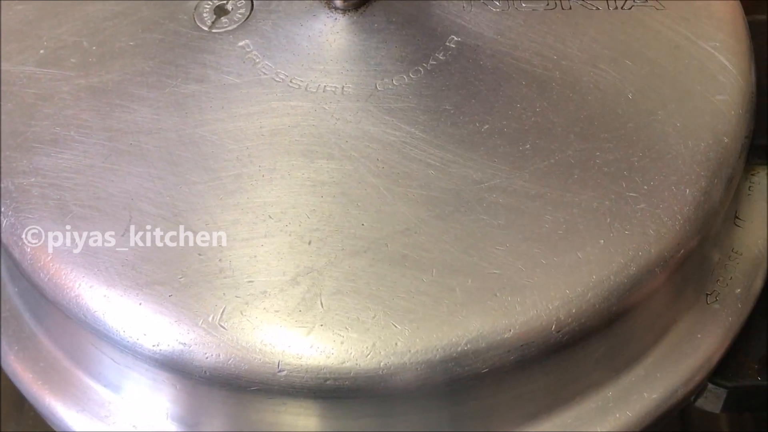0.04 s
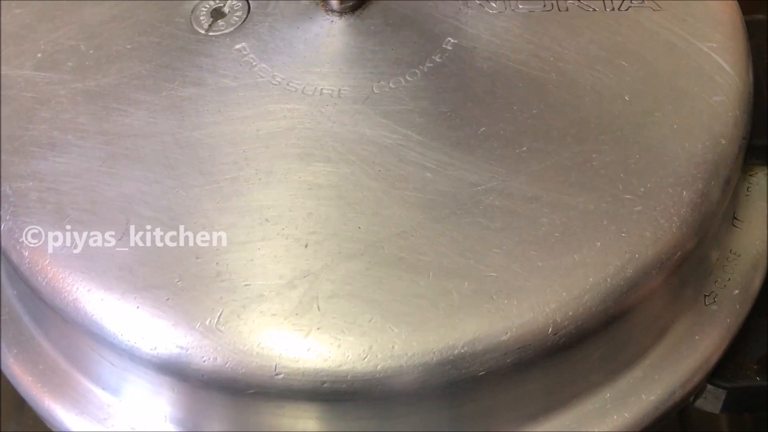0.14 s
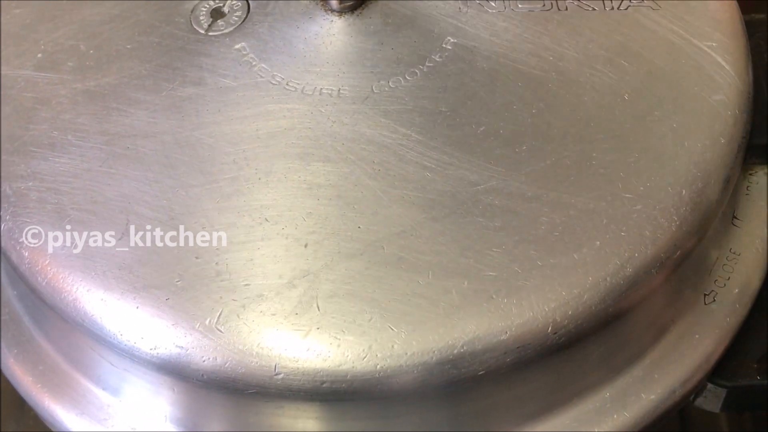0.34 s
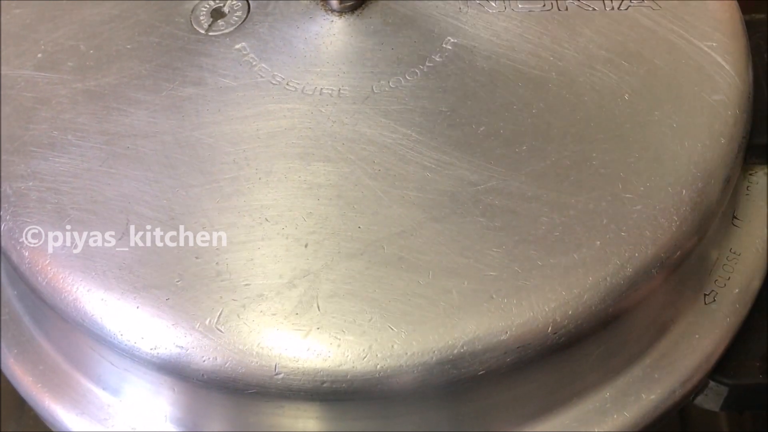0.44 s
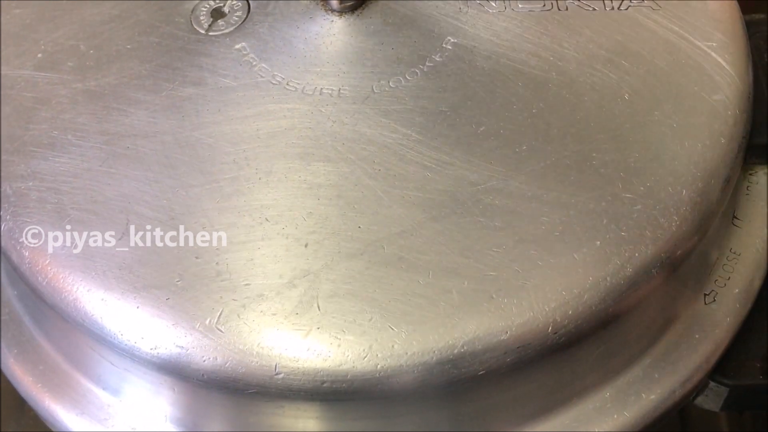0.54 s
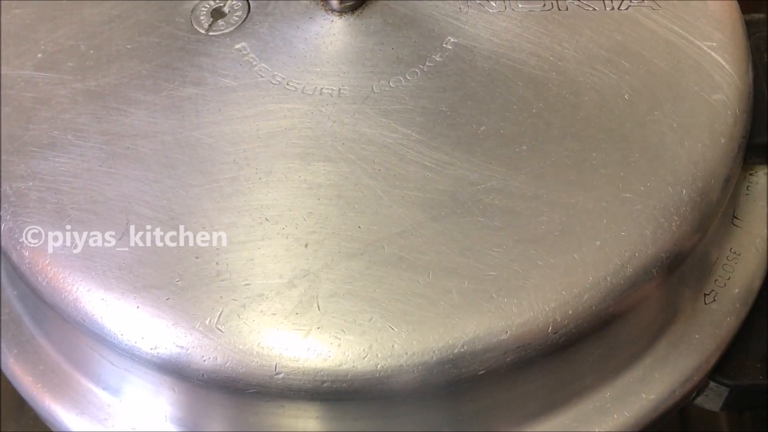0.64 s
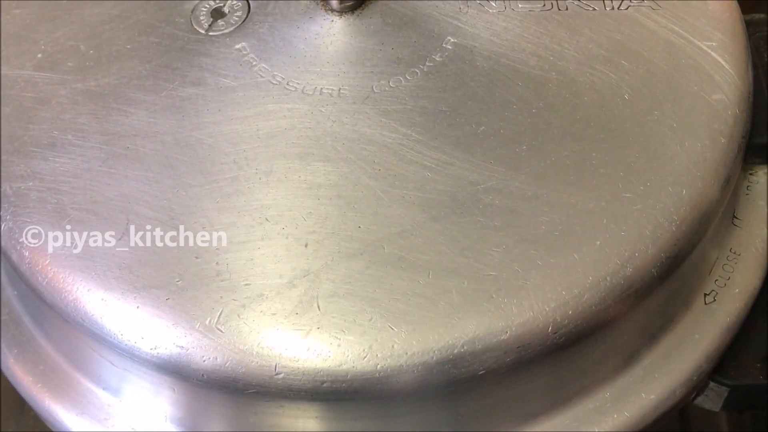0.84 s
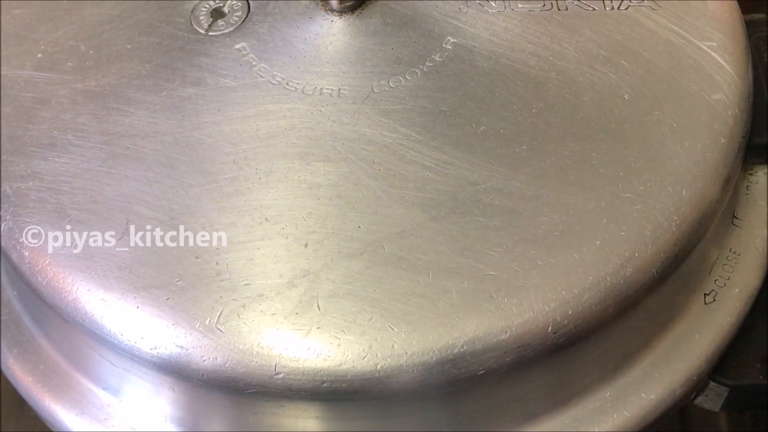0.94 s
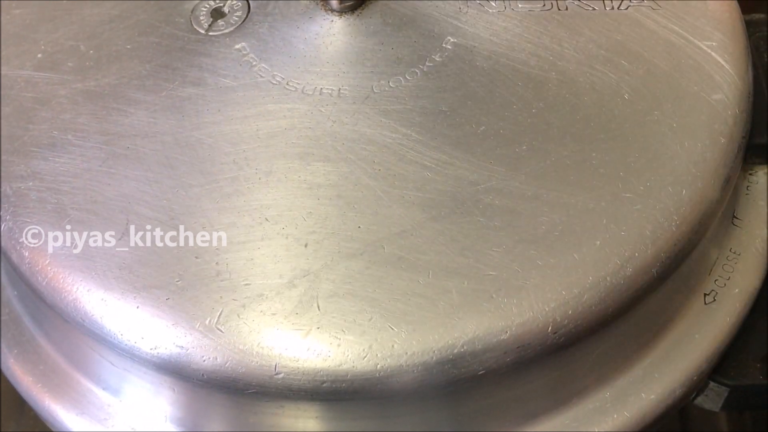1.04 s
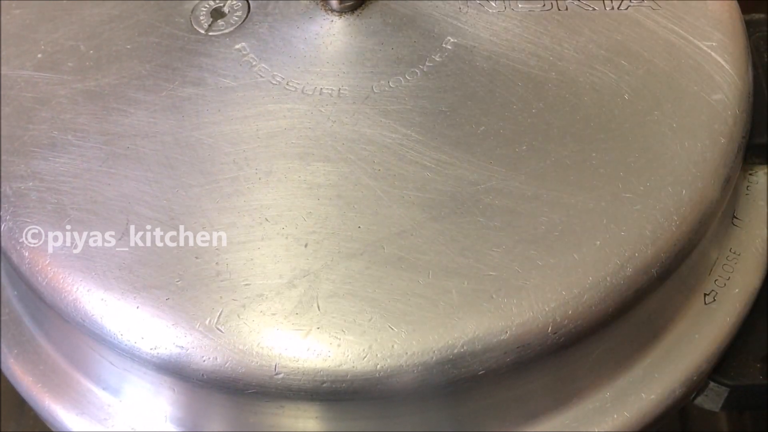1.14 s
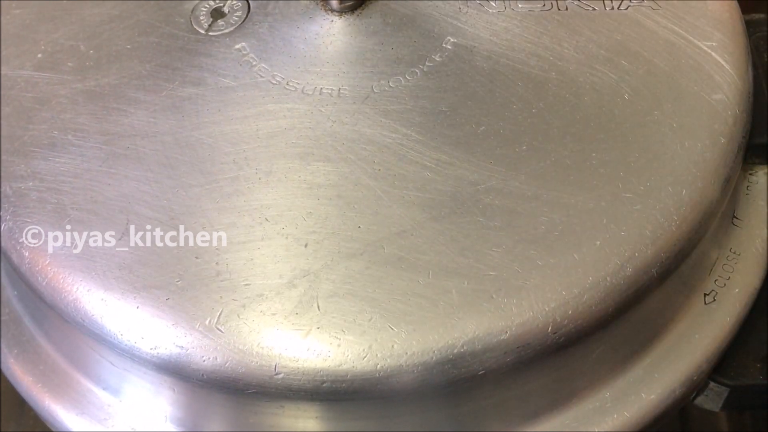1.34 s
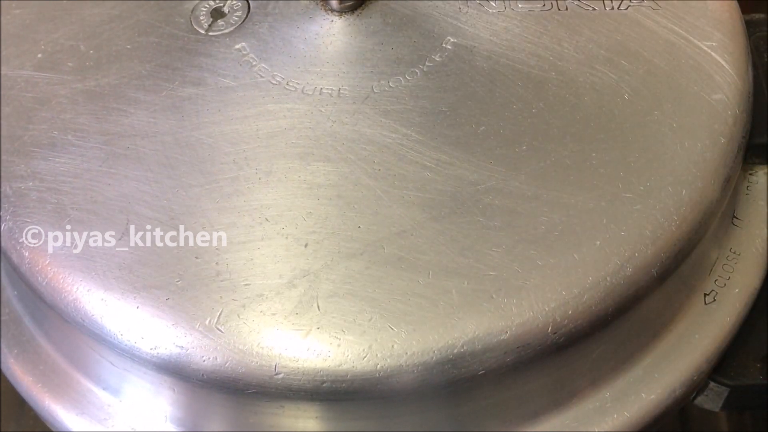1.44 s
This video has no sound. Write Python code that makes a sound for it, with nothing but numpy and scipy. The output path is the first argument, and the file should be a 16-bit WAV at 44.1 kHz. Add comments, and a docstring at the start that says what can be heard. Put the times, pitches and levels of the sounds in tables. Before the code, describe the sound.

Close microphone on a pressure cooker lid in a small kitchen: damped metal knocks, a brief rising scrape, a loud sharp clink with short shimmering ring, then a muted thud over low room rumble.

```python
"""Opening a pressure cooker lid

A metal lid is twisted open in a home kitchen. Its lugs knock dully while the rim still holds it (short, damped
tones), slide (a swell of tiny random slips), then slip free with a bright clink (long tones, some close enough
to beat, plus fading noise). The handle thuds softly (low tones and a noisy clatter). Shaped noise makes
the pot's rocking, the room rumble, the hiss and a faint whine.
"""
import sys
import numpy as np
from scipy import signal
from scipy.fft import rfft, irfft
from scipy.io import wavfile

SR = 44100
rng = np.random.default_rng(int(sys.argv[2]) if len(sys.argv) > 2 else 0)


def output_pcm(signal):
    """Save a mono or channel-first signal as 16-bit PCM at the path in sys.argv[1].

    Samples are clipped to [-1, 1] before scaling.
    """
    pcm = np.clip(np.atleast_2d(signal).T, -1, 1) * 32767
    wavfile.write(sys.argv[1], SR, np.round(pcm).astype(np.int16))


N = 66150   # length in samples: 1.5 seconds
TIME = np.arange(N) / SR   # seconds

# In every table, dB are relative levels unless a comment says otherwise.
# T60 is the time in seconds that a sound takes to fade by 60 dB.

# Low room rumble. Each row: pitch in Hz, noise level in dB per Hz.
RUMBLE_SPECTRUM = [(32, -18), (42, -11.5), (55, -2), (75, -8), (105, 3), (135, -3.5), (200, -8.5),
                   (325, -7), (420, -18), (800, -21), (1500, -20.5), (3000, -49.5)]
# Background hiss. Each row: pitch in Hz, noise level in dB per Hz.
HISS_SPECTRUM = [(880, -31), (1500, -7.5), (2000, -3.5), (4420, -7), (4970, -9.5), (14300, -14.5),
                 (16000, -15.5)]
# How loud the hiss is over time. Each row: time in seconds, overall (rms) level in dB.
HISS_LEVEL_OVER_TIME = [(0.0, -73), (0.132, -70), (0.262, -66), (0.638, -70.5), (0.802, -73),
                        (1.018, -67.5), (1.244, -72.5), (1.5, -74.5)]
# Faint narrow whine in the hiss. Each row: pitch in Hz, noise level in dB per Hz.
WHINE_SPECTRUM = [(9500, -36), (10150, 0.5), (10800, -35.5)]
RUMBLE_DB, WHINE_DB = -60, -89

# The heavy pot rocks on the stove during the twist. Each row: pitch in Hz, noise level in dB per Hz.
ROCKING_SPECTRUM = [(45, -12.5), (65, -3), (105, 3.5), (160, 4), (230, -9.5), (500, -20.5), (1000, -47)]
ROCKING_PEAK_DB, ROCKING_PEAK_S, ROCKING_WIDTH_S = -51.5, 0.18, 0.077

# Lugs knock against the rim. Each row: start in seconds, level in dB, contact brightness in Hz.
KNOCK_BLOWS = [(0.0913, -11.5, 6000), (0.0931, 0, 4003), (0.1605, -6.5, 699), (0.191, -3.5, 1000),
               (0.1939, 1.5, 799)]
# Tones of the lid while the rim damps it. Each entry: pitch in Hz, then level in dB and T60 in seconds.
HELD_LID_MODES = {865: (-33, 0.069), 958: (-30, 0.099), 1025: (-44.5, 0.024), 1490: (-44.5, .04),
                  1527: (-29.5, 0.13), 1645: (-48.5, .05), 3382: (-38, 0.075), 4070: (-44.5, .035),
                  5750: (-42.5, .02), 6369: (-46, .06)}

# Lugs slide under the rim. Each row: pitch in Hz, noise level in dB per Hz.
SLIDE_SPECTRUM = [(500, -14.5), (950, 8.5), (1500, 3.5), (2500, -13), (4000, 2), (5000, -13), (6500, -3.5),
                  (7500, -10.5), (8600, -6), (11000, -14.5), (15000, -21.5)]
SLIDE_END_S, SLIDE_END_DB, SLIDE_RISE_DB_PER_S, SLIPS_PER_S = 0.206, -42.5, 540, 7000

# The lid slips free and strikes the pot. Each row: start in seconds, level in dB,
# and the pitch in Hz below which the contact excites less and less.
CLINK_BLOWS = [(0.2041, -9.5, 12000), (.2074, -12.5, 3000), (0.2099, 0, 400)]
# Tones of the free lid, some close enough to beat. Each entry: pitch in Hz, then level in dB
# and T60 in seconds.
FREE_LID_MODES = { 945: (-26.5, 0.19), 1335: (-19, .33), 1355: (-20.5, .3), 1400: (-17, 0.036),
                  1827: (-41.5, .2), 2019: (-32, 0.18), 2024: (-45.5, .55), 2570: (-46, 0.17),
                  3307: (-32, 0.086), 3470: (-14, 0.062), 3456: (-40.5, 0.44), 3471: (-41, 0.49),
                  3760: (-29, 0.024), 4124: (-39.5, 0.16), 5280: (-49.5, 0.48), 5600: (-21.5, .015),
                  6364: (-22.5, .065), 6746: (-28.5, 0.057), 8510: (-25.5, .04), 8853: (-27, 0.04),
                  13329: (-26, 0.034)}
# Crowded small tones of the sheet metal at the strike. Each row: pitch in Hz, noise level in dB per Hz.
CRASH_SPECTRUM = [(400, -18), (700, -5.5), (1300, 5), (2000, -7), (2450, -12.5), (2950, -15.5), (3700, 7.5),
                  (4600, -9.5), (6300, 0), (9000, 2.5), (11500, -5), (15500, -6.5)]
# Their longer after-ring in the kitchen. Each row: pitch in Hz, level in dB per Hz.
AFTER_RING_SPECTRUM = [(300, -11.5), (700, -14.5), (1000, -2), (1400, 0.5), (2100, 0), (2800, -12.5),
                       (3450, 1.5), (4700, -20), (5400, -2.5), (6500, -1), (7700, -13), (8800, -8.5),
                       (11000, -16.5), (15500, -20.5)]
CRASH_DB, CRASH_T60_S = -18.5, 0.025
AFTER_RING_DB, AFTER_RING_T60_S = -34.5, 0.26
SMALL_MODES, SMALL_MODE_LOW_HZ, SMALL_MODE_HIGH_HZ = 700, 300, 16500
# The clink jolts the pot, which sways on the stove. Each entry: pitch in Hz, then level in dB
# and T60 in seconds.
POT_SWAY_MODES = {56: (-50.5, 0.86), 105: (-52, 0.36), 151: (-51.5, .2)}

# The handle thuds. Each row: start in seconds, level in dB.
THUD_BLOWS = [(0.5248, 3), (0.5277, -12), (0.5366, -20)]
# Tones of handle and pot. Each entry: pitch in Hz, then level in dB and T60 in seconds.
HANDLE_MODES = {280: (-54, 0.15), 350: (-42, 0.079), 435: (-55.5, 0.11), 650: (-44.5, 0.039),
                845: (-45.5, 0.05), 950: (-52, 0.047), 1285: (-52, 0.07), 1620: (-63, 0.063),
                1760: (-54, 0.045), 2573: (-63, 0.086)}
# The handle's short dull clatter. Each row: pitch in Hz, noise level in dB per Hz.
CLATTER_SPECTRUM = [(180, 11), (350, 2), (900, 0), (1200, -16), (1750, -3.5), (2100, -38), (5000, -49)]
CLATTER_DB, CLATTER_T60_S = -51.5, 0.19

KNOCK_ROOM_DB, CLINK_ROOM_DB, THUD_ROOM_DB, ROOM_T60_S = -11, -17, -4.5, 0.38
LID_LOW_CUT_HZ = 823       # the thin lid gives off little bass
BUILD_UP_CYCLES = 0.98     # a tone needs about this many cycles to take up a blow
TOP_CUT_HZ = 17200         # from here up, the sound is at least 60 dB weaker


def from_db(db):
    """Turn decibels into a gain."""
    return 10 ** (np.asarray(db) / 20)


def colour(x, spectrum):
    """Weight the pitches in x by a table of Hz and dB, then scale to an rms of 1."""
    table_hz, table_db = np.transpose(spectrum)
    hz = np.maximum(np.arange(N // 2 + 1) * SR / N, 1)
    fade_below = np.minimum(hz / table_hz[0], 1) ** 2   # softer below the first row
    gain = from_db(np.interp(np.log(hz), np.log(table_hz), table_db))
    y = irfft(rfft(x) * fade_below * gain, N)
    return y / np.std(y)


def noise(spectrum):
    """Random noise with the given spectrum and an rms of 1."""
    return colour(rng.standard_normal(N), spectrum)


def background():
    """Steady room rumble, a slowly wavering hiss and a faint whine, all made of noise."""
    hiss_db = np.interp(TIME, *np.transpose(HISS_LEVEL_OVER_TIME))
    rumble = from_db(RUMBLE_DB) * noise(RUMBLE_SPECTRUM)
    hiss = from_db(hiss_db) * noise(HISS_SPECTRUM)
    whine = from_db(WHINE_DB) * noise(WHINE_SPECTRUM)
    return rumble + hiss + whine


def rocking():
    """The rocking pot rumbles low, swelling and fading along a bell curve."""
    swell = np.exp(-0.5 * ((TIME - ROCKING_PEAK_S) / ROCKING_WIDTH_S) ** 2)
    return from_db(ROCKING_PEAK_DB) * noise(ROCKING_SPECTRUM) * swell


def decay(t60):
    """Exponential fade from 1, losing 60 dB in t60 seconds."""
    return np.exp(-np.log(1000) * TIME / t60)


def convolve(x, response):
    """Let each sample of x set off a scaled copy of the response."""
    return signal.fftconvolve(x, response)[:N]


def click(s, db):
    """A blow that lasts a single sample."""
    return from_db(db) * (np.arange(N) == int(s * SR))


def one_pole(x, hz, kind):
    """Gentle filter that keeps the lows ("low") or the highs ("high")."""
    return signal.lfilter(*signal.butter(1, hz, kind, fs=SR), x)


def ring(modes):
    """Response of a struck body: tones that build up within a cycle or so, then die away."""
    total = np.zeros(N)
    for hz, (db, t60) in modes.items():
        build_up = 1 - np.exp(-TIME * hz / BUILD_UP_CYCLES)
        total += from_db(db) * build_up * decay(t60) * np.sin(2 * np.pi * hz * TIME)
    return total


def radiate(x):
    """Sound leaving the thin lid, with the bass cut."""
    return signal.sosfilt(signal.butter(3, LID_LOW_CUT_HZ, "high", fs=SR, output="sos"), x)


def kitchen(x, room_db):
    """Add the blurred reflections of a small room, as a fading noise tail."""
    tail = rng.standard_normal(N) * decay(ROOM_T60_S) * (TIME > 0.004)   # after a 4 ms gap
    return x + from_db(room_db) * convolve(x, tail / np.linalg.norm(tail))


def knocks():
    """Soft contacts, weak in treble, ring the lid while the rim damps it."""
    blows = sum(one_pole(click(s, db), hz, "low") for s, db, hz in KNOCK_BLOWS)
    soft_blows = one_pole(blows, hz=6000, kind="low")
    lid = convolve(soft_blows, ring(HELD_LID_MODES))
    return kitchen(radiate(lid), KNOCK_ROOM_DB)


def slide():
    """Dense tiny slips at random moments grow louder until the lugs let go."""
    slips = (rng.random(N) < SLIPS_PER_S / SR) * rng.standard_normal(N)
    seconds_left = np.maximum(SLIDE_END_S - TIME, 0)
    swell = from_db(SLIDE_END_DB - SLIDE_RISE_DB_PER_S * seconds_left)
    return colour(slips, SLIDE_SPECTRUM) * swell * (TIME < SLIDE_END_S)


def shimmer(spectrum):
    """Hundreds of small, unevenly spaced tones of the sheet metal, with an rms of 1."""
    place, strength, phase = rng.random((SMALL_MODES, 3)).T
    position = (np.arange(SMALL_MODES) + place) / SMALL_MODES
    # squaring crowds the tones toward the low end
    hz = SMALL_MODE_LOW_HZ + (SMALL_MODE_HIGH_HZ - SMALL_MODE_LOW_HZ) * position ** 2
    lines = np.zeros(N // 2 + 1, complex)
    lines[(hz * N / SR).astype(int)] = strength * np.exp(2j * np.pi * phase)
    return colour(irfft(lines, N), spectrum)


def clink():
    """Two grazing ticks and a full blow ring the free lid; the full blow also jolts the pot."""
    blows = sum(one_pole(click(s, db), hz, "high") for s, db, hz in CLINK_BLOWS)
    crash = from_db(CRASH_DB) * noise(CRASH_SPECTRUM) * decay(CRASH_T60_S)
    after_ring = from_db(AFTER_RING_DB) * shimmer(AFTER_RING_SPECTRUM) * decay(AFTER_RING_T60_S)
    struck_lid = kitchen(radiate(ring(FREE_LID_MODES) + crash), CLINK_ROOM_DB)
    lid = convolve(blows, struck_lid + after_ring)
    full_blow_s = CLINK_BLOWS[-1][0]
    sway = convolve(click(full_blow_s, 0), ring(POT_SWAY_MODES))
    return lid + sway


def handle():
    """Dull blows ring the handle and pot, with a noisy clatter that fades."""
    blows = one_pole(sum(click(s, db) for s, db in THUD_BLOWS), hz=1930, kind="low")
    clatter = from_db(CLATTER_DB) * noise(CLATTER_SPECTRUM) * decay(CLATTER_T60_S)
    thud = convolve(blows, ring(HANDLE_MODES) + clatter)
    return kitchen(thud, THUD_ROOM_DB)


def scene():
    """Add up all the sources into one channel."""
    mix = knocks() + slide() + clink() + handle() + rocking() + background()
    return mix[None]


def record(dry):
    """Cut the very top of the treble with a steep filter."""
    return signal.sosfilt(signal.cheby2(12, 60, TOP_CUT_HZ, fs=SR, output="sos"), dry)


dry = scene()
out = record(dry)
output_pcm(out)
```